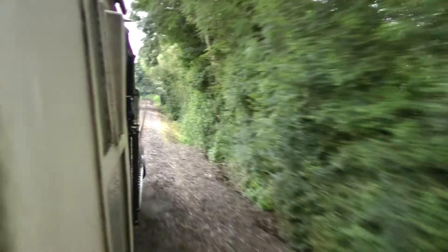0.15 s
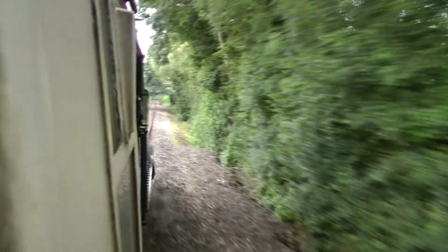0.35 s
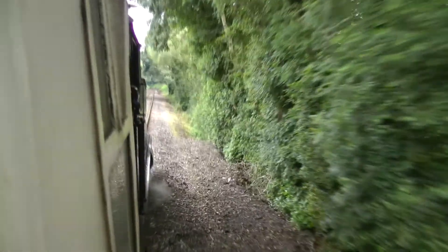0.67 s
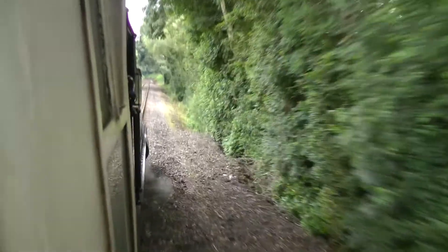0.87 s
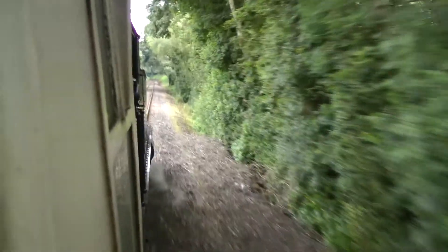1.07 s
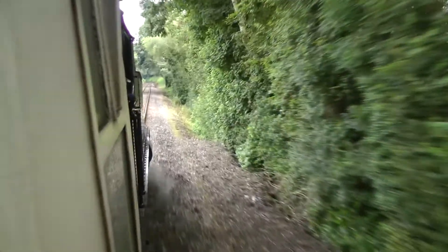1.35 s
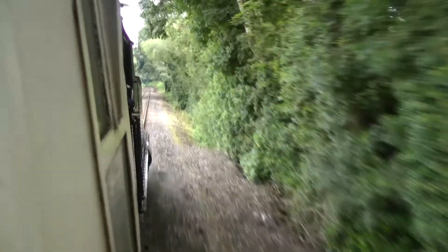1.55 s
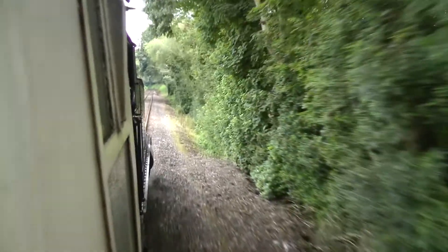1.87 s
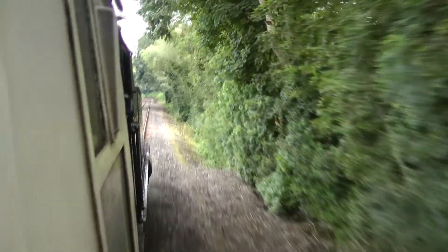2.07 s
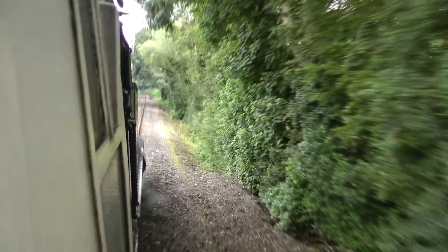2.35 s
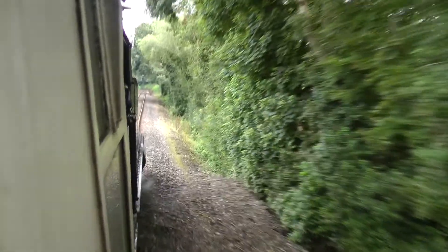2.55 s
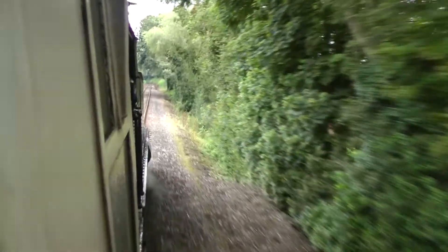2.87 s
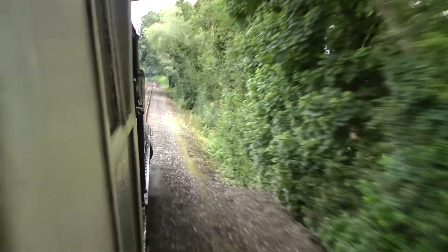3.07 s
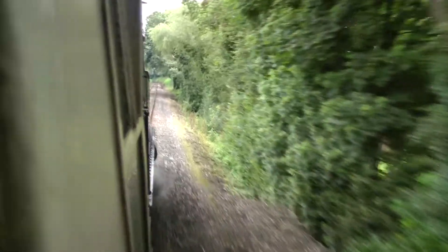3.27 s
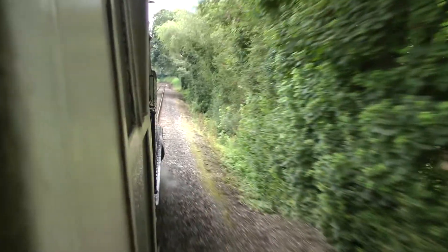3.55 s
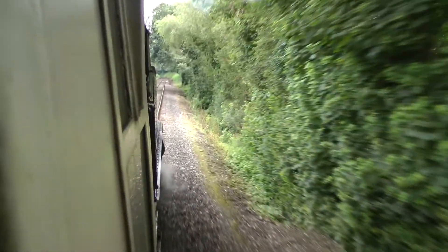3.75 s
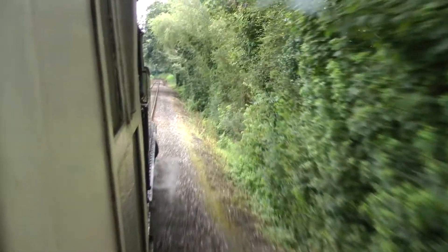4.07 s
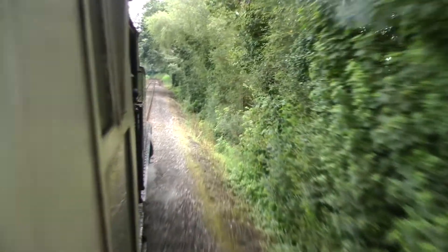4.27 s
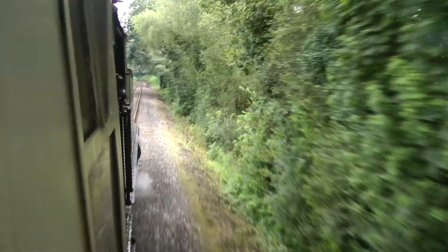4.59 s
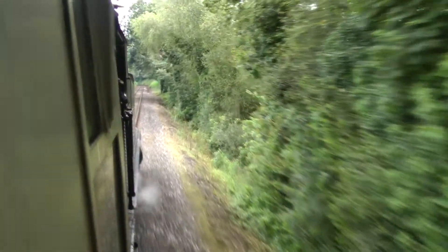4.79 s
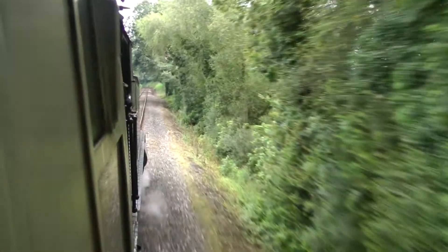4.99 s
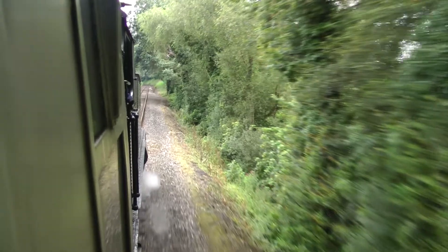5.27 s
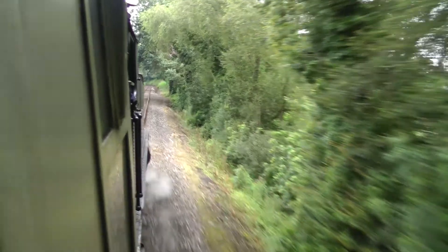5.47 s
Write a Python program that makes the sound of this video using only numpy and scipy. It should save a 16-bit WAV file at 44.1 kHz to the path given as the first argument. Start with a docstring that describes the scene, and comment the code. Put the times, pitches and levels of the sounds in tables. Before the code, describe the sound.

A steam locomotive pulls hard uphill, heard from a carriage window beside a wall of trees, for about 5.6 seconds. A beat is already sounding at 0 s; the next come near 0.19, 0.38, 0.56 and 0.77 s, and so on at just over five a second, with no real change of speed. The pattern is four beats long: three strong, one soft, the soft ones near 0.4, 1.15, 1.9, 2.7, 3.45, 4.2 and 5.0 s. Strong beats start with a low push of air, then a rough, fluttering roar of roughly a tenth of a second, a hollow boom around 185 Hz and a breathy whistle near 2.7 kHz, most noticeable around 1.3 s. Brighter steam hiss accompanies every stroke, starting slightly ahead of alternate beats. Leaves scatter the blasts into a short blurred tail. Steady low wheel rumble continues underneath, with faint random jolts and duller knocks near 1.65 and 4.35 s.

```python
"""At a carriage window beside a wall of trees, a steam locomotive is heard climbing hard.
Four exhaust beats a wheel turn, one of them soft: each has a roaring turbulent jet, a chimney resonance
and a nozzle whistle; the three strong beats open with a pressure front, the soft one with hardly any.
Steam hisses at the cylinders with each stroke, ahead of every other beat. The trees scatter the jet into a
smeared tail over the rumble of wheels and carriage body, shaped noise with dull knocks."""
import sys
import numpy as np
from scipy import signal
from scipy.fft import rfft, irfft, next_fast_len
from scipy.io import wavfile
from scipy.ndimage import uniform_filter1d

SR = 44100
rng = np.random.default_rng(int(sys.argv[2]) if len(sys.argv) > 2 else 0)


def volts(x):
    """Linear amplitude factor 10**(x/20) for a level x in dB, scalar or array-like."""
    e = np.asarray(x, float) / 20
    return 10 ** e


def waveform_to_disk(signal):
    """Save audio, clipped to [-1, 1], as 16-bit WAV at the path in sys.argv[1]."""
    frames = np.transpose(np.atleast_2d(signal))
    scaled = np.clip(frames, -1, 1) * 32767
    samples = np.round(scaled).astype(np.int16)
    wavfile.write(sys.argv[1], SR, samples)


N = 248283
TIME = np.arange(N) / SR
HZ = np.fft.rfftfreq(next_fast_len(N), 1 / SR)

# exhaust beats: valve opening t/s, jet level/dB, chimney boom level/dB, pressure front level/dB,
# nozzle whistle level/dB
EXHAUST_BEATS = [(-0.003, -14, -14.5, -30, -30.5), (0.191, -12.5, -19, -16.5, -25),
                 (0.379, -16, -19, -25, -25), (.558, -12, -13, -19, -26), (.766, -12.5, -19, -15, -20),
                 (0.958, -13, -15, -17, -29.5), (1.146, -14, -16, -27, -21),
                 (1.327, -11.5, -18.5, -15, -13), (1.535, -12.5, -17, -16, -23.5),
                 (1.732, -12.5, -13, -24, -33), (1.921, -16, -18, -30, -24.5),
                 (2.098, -13, -15, -15, -25.5), (2.3035, -12, -22, -13, -37.5),
                 (2.5, -13, -13.5, -24, -29.5), (2.6864, -16, -20.5, -30, -21.5),
                 (2.868, -12, -14.5, -18, -25), (3.0715, -11.5, -17, -16, -20.5),
                 (3.27, -12.5, -13.5, -17, -26), (3.455, -17, -14, -30, -22.5),
                 (3.638, -13.5, -15, -18, -21), (3.8425, -13, -24.5, -18, -21), (4.04, -13, -13, -19, -29),
                 (4.227, -14, -20.5, -27, -31), (4.4101, -15, -16.5, -18, -28),
                 (4.6128, -15, -15.5, -16, -20.5), (4.809, -13.5, -18, -19, -25.5),
                 (4.998, -17.5, -18.5, -28, -28.5), (5.1793, -13, -16, -21, -30.5),
                 (5.3846, -13.5, -20, -13.5, -24), (5.58, -14.5, -15.5, -13, -25.5)]
# the two microphone ports: f/Hz, likeness (0-1), phase lead of the left/rad, left minus right level/dB
MICROPHONE_PORTS = [(40, 0.8, 0.18, -4), (141, 1, 0.46, -5), (328, 0.9, 0.24, -3), (650, 0.78, 0.62, .9),
                    (1300, 0.61, .4, 0.5), (2420, 0.77, 0.48, 1), (3630, 0.53, 0.39, -0.5),
                    (4800, 0.3, 2.05, 1), (6900, 0.56, 0.55, 3.5), (9000, 0.4, 1.57, -1.5),
                    (11500, 0.62, 2.27, 2), (15500, 0.1, 2.7, 1.2)]
PORT_HZ, *PORT_COLUMNS = np.transpose(MICROPHONE_PORTS)
LIKENESS, LEAD, BALANCE_DB = (np.interp(np.log(HZ + 1), np.log(PORT_HZ), column) for column in PORT_COLUMNS)


def unit(response):
    """Power normalization: the response keeps white noise at rms 1."""
    return response / np.sqrt(np.mean(np.abs(response) ** 2))


def colour(points):
    """Spectral shaping: levels in dB interpolated over log frequency, at unit noise power."""
    hz, db = np.transpose(points)
    return unit(volts(np.interp(np.log(HZ + 1), np.log(hz), db)))


def resonance(hz, width):
    """Second-order resonance: unity at its centre, with a half-power width in Hz."""
    return 1j * HZ * width / (hz ** 2 - HZ ** 2 + 1j * HZ * width)


def through(x, response):
    """Linear filtering: the spectrum is multiplied by the response."""
    size = next_fast_len(N)
    return irfft(rfft(x, size) * response, size)[..., :N]


def turbulence():
    """Partial coherence: white noise at both ports is partly shared, the right a little late."""
    left, other = rng.standard_normal((2, N))
    like = np.clip(LIKENESS, 0, 0.999)
    shared = through(left, like * np.exp(-1j * LEAD))
    separate = through(other, np.sqrt(1 - like ** 2))
    return np.array([left, shared + separate])


def eddies(rate, step_db):
    """Random amplitude modulation: gain steps, rate per second, of rms step_db before smoothing."""
    k = int(SR / rate)
    steps = np.repeat(rng.standard_normal(N // k + 1), k)
    smooth = uniform_filter1d(uniform_filter1d(steps, k), k)[:N]
    return volts(step_db * smooth)


def bursts(starts, db, rise_ms, fall_ms, hold_ms, knee=1.):
    """Power envelope of bursts that swell, hold and decay, ever faster for a knee above 1."""
    power = np.zeros(N)
    for t0, gain, rise, fall, hold in np.broadcast(starts, volts(db), rise_ms, fall_ms, hold_ms):
        first = max(int(t0 * SR), 0)
        span = slice(first, first + SR // 2)
        ms = 1000 * np.abs(TIME[span] - t0)
        swell = (1 - np.exp(-ms / rise)) ** 1.56
        decay = np.exp(-(np.maximum(ms - hold, 0) / fall) ** knee)
        power[span] += (gain * swell * decay) ** 2
    return power


def strokes(table):
    """Periodicity: a per-stroke table repeats over all beats, its lag in ms becoming a start in s."""
    lag_ms, *rest = np.resize(table, (len(EXHAUST_BEATS), len(table[0]))).T
    return np.transpose(EXHAUST_BEATS)[0] + lag_ms / 1000, *rest


def wheels():
    """Structural excitation: rolling noise and dull knocks sound through resonances of the carriage."""
    # rolling rumble: f/Hz, level/dB
    rumble_spectrum = [(12, -44), (20, -9), (76, -6.5), (176, 1.5), (960, -10.5), (2090, -12.5),
                       (2690, -10.5), (4700, -18.5), (9420, -24.5), (12500, -31.5), (15600, -41)]
    # louder knocks of the running gear: t/s, level/dB
    gear_knocks = [(1.655, -23), (4.345, -21.5)]
    # carriage body modes: f/Hz, width of a single resonance/Hz, level/dB
    body_modes = [(45.8, 12, -45.5), (70, 13, -50)]
    rolling = volts(-29) * through(turbulence() * eddies(4.47, 0.88), colour(rumble_spectrum))
    # sixty lesser jolts at random times
    chance = rng.random((60, 2))
    jolts = bursts(chance[:, 0] * TIME[-1], -36 + 9 * chance[:, 1], rise_ms=7.8, fall_ms=6.8, hold_ms=3.5)
    jolts += bursts(*np.transpose(gear_knocks), rise_ms=3.0, fall_ms=12, hold_ms=8.2)
    for hz, width, db in body_modes:
        rolling += volts(db) * through(turbulence(), unit(resonance(hz, width) ** 2))
    knocks = through(turbulence() * np.sqrt(jolts), unit(resonance(430, 240) ** 2))
    return rolling + knocks


def cylinders():
    """Turbulent efflux: steam under pressure hisses with a sudden start, a plateau and a fade."""
    # escaping steam: f/Hz, level/dB
    hiss_spectrum = [(350, -43), (600, 2), (788, -6.5), (1360, -2.5), (1470, -10), (1860, -1.5),
                     (3830, 1.5), (11500, -10), (15600, -21.5)]
    # puffs of the four strokes: lag after the valve opens/ms, level/dB, rise/ms, hold/ms
    stroke_puff = [(-27, -23.5, 5.6, 75), (6.5, -23, 3.6, 51), (-31.5, -22, 2.9, 62), (7.5, -22.5, 5, 50)]
    starts, db, rise_ms, hold_ms = strokes(stroke_puff)
    power = bursts(starts, db, rise_ms, fall_ms=61, hold_ms=hold_ms)
    return through(turbulence() * np.sqrt(power) * eddies(50, 2.05), colour(hiss_spectrum))


def trees(jet, starts, fade_s=0.072):
    """Diffuse scattering: leaves at every distance return the jet; each beat has new ripples in its colour."""
    # sound returned by leaves: f/Hz, level/dB
    leaf_spectrum = [(35, -46), (60, -21), (145, -28), (360, -2.5), (1150, -4.5), (2850, -9.5),
                     (4540, -18.5), (8110, -23.5), (11200, -37), (15600, -52)]
    out, size = np.zeros((2, N + SR)), SR // 4
    leaves = turbulence()
    decay = np.exp(-TIME[:size] / fade_s)
    fade = decay * np.sqrt(2 / (fade_s * SR))  # unit energy
    edges = np.append(np.maximum(starts * SR, 0).astype(int), N)
    for k, (a, b) in enumerate(zip(edges, edges[1:])):
        # successive beats share half their leaves, at other distances
        paths = leaves[:, k * (size // 2):][:, :size] * fade
        out[:, a:b + size - 1] += signal.fftconvolve(jet[None, a:b], paths, axes=1)
    # the beat before the first is still fading
    out[:, :size] += volts(-20) * leaves[:, -size:] * decay
    return through(out[:, :N], colour(leaf_spectrum))


def fronts():
    """Impulse response: a short push of air sets the chimney swinging, hardly at all on soft beats."""
    # the beat already under way at the start has no front
    starts, _, _, db, _ = np.transpose(EXHAUST_BEATS[1:])
    kicks = np.zeros(N)
    kicks[(starts * SR).astype(int)] = volts(db)
    t = TIME[:SR // 10]
    swing = np.sin(2 * np.pi * 150 * t) * (1 - np.exp(-t / 0.0024)) * np.exp(-t / 0.0047)
    push = np.sin(np.pi * np.minimum(t / 0.0064, 1)) ** 2
    wave = signal.fftconvolve(kicks, 2.74 * swing + 0.5 * push)[:N]
    return np.array([wave, through(wave, np.exp(-1j * LEAD))])


def nozzle():
    """Narrow-band resonance: turbulence rings as a breathy whistle whose pitch differs between strokes."""
    # whistles of the four strokes: lag after the valve opens/ms, f/Hz, hold/ms, fall/ms
    stroke_whistle = [(2.3, 2670, 23, 37), (3, 2770, 26, 41), (0.1, 2670, 32, 50), (4, 2790, 17, 30)]
    width_hz = 200  # of each of two resonances in series
    out, air = np.zeros((2, N)), turbulence() * eddies(60, 2.8)
    levels_db = np.transpose(EXHAUST_BEATS)[-1]
    # a narrow band passes a small share of the noise: bring it back near rms 1
    makeup = np.sqrt(SR / (np.pi / 2 * width_hz))
    for t0, hz, hold_ms, fall_ms, db in zip(*strokes(stroke_whistle), levels_db):
        span = slice(max(int(t0 * SR), 0), int((t0 + 0.3) * SR))
        power = bursts(t0, db, 5.2, fall_ms, hold_ms)
        breath = (air * np.sqrt(power))[:, span]
        ring = signal.iirpeak(hz, hz / width_hz, fs=SR)
        once = signal.lfilter(*ring, breath)
        out[:, span] += signal.lfilter(*ring, once) * makeup
    return out


def exhaust():
    """Jet noise and air-column resonance: the jet roars, the chimney booms, and the trees answer the jet."""
    # jet roar: f/Hz, level/dB
    jet_spectrum = [(24, -57), (40, -39), (133, -5.5), (183, -4), (266, -8.5), (334, -5.5), (473, -7),
                    (819, -9), (1530, -11), (1870, -11), (2780, -12.5), (4700, -27.5), (7740, -31.5),
                    (11800, -38.5), (15600, -55)]
    # chimney air column: f/Hz, width of a single resonance/Hz, level/dB
    chimney_modes = [(185.5, 118, 3), (358, 76, -10.5), (667, 92, -7.5), (796, 160, -19), (1620, 49, -13)]
    # jets of the four piston strokes of a wheel turn, in order, the third soft:
    # lag after the valve opens/ms, rise/ms, hold/ms, fall/ms
    stroke_jet = [(5.2, 7.8, 20.1, 45.2), (3, 8.1, 20.5, 47.6), (5.3, 8.3, 16.5, 47.7),
                  (6.1, 8.9, 20.6, 46)]
    _, db, boom_db, _, _ = np.transpose(EXHAUST_BEATS)
    starts, rise_ms, hold_ms, fall_ms = strokes(stroke_jet)
    jet = bursts(starts, db, rise_ms, fall_ms, hold_ms, knee=1.45)
    # the boom starts before the jet and holds longer
    boom = bursts(starts - 0.0048, boom_db, rise_ms, 0.84 * fall_ms, hold_ms + 7.3, knee=1.07)
    # large eddies shake the low roar, small ones tear the bright part, each in its own time
    low = 1 / (1 + (HZ / 1100) ** 4)
    deep = 1 / (1 + (HZ / 450) ** 4)
    air = turbulence()
    torn = through(air, deep) * eddies(35, 4.2)
    torn = torn + through(air, low - deep) * eddies(55, 4.6)
    torn = torn + through(air, 1 - low) * eddies(90, 2.7)
    blast = torn * np.sqrt(jet)
    column = sum(volts(gain_db) * np.abs(resonance(hz, width)) ** 2 for hz, width, gain_db in chimney_modes)
    drum = through(turbulence() * np.sqrt(boom) * eddies(40, 5.1), unit(column))
    return through(blast, colour(jet_spectrum)) + drum + volts(-4.5) * trees(blast[0], starts)


def scene():
    """Superposition: exhaust, whistle, fronts, cylinder steam and wheels add linearly."""
    return exhaust() + nozzle() + fronts() + cylinders() + wheels()


def top_cut(x):
    """Nothing passes above the cut-off."""
    return signal.sosfilt(signal.butter(12, 15710, fs=SR, output="sos"), x)


def record(dry):
    """Dynamic compression: the right port favours the bass, a limiter holds the beats, peaks are rounded."""
    ports = through(dry, volts(np.array([BALANCE_DB, -BALANCE_DB]) / 2))
    loudness = np.sqrt(uniform_filter1d(np.mean(ports ** 2, axis=0), int(0.0068 * SR)))
    held = ports * np.minimum(volts(-13) / (loudness + 1e-9), 1) ** 0.41
    # soft saturation above 0.7 of full scale
    over = np.maximum(np.abs(held) - 0.7, 0)
    rounded = held - np.sign(held) * (over - 0.24 * np.tanh(over / 0.24))
    return top_cut(rounded)


dry = scene()
out = record(dry)
waveform_to_disk(out)
```